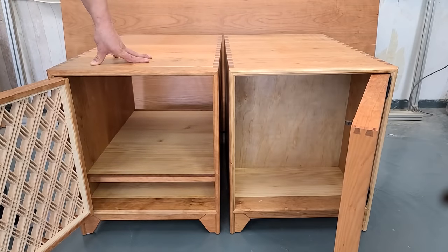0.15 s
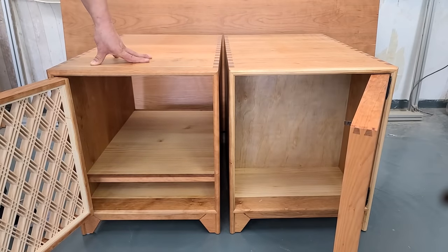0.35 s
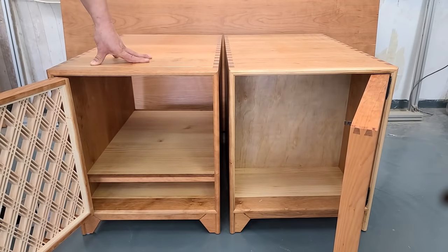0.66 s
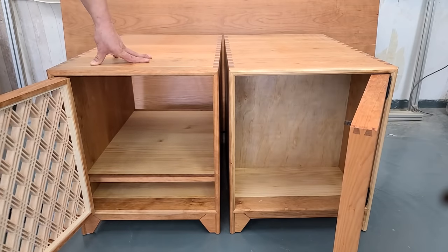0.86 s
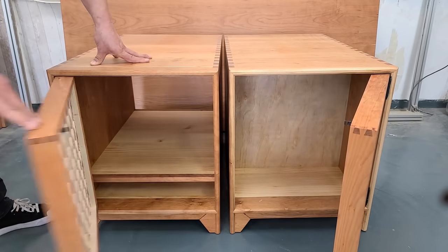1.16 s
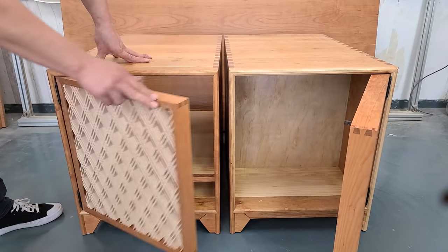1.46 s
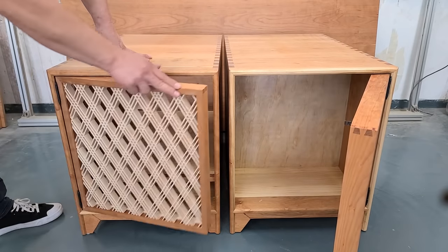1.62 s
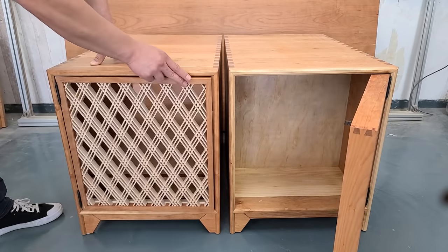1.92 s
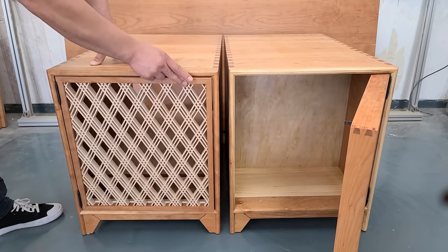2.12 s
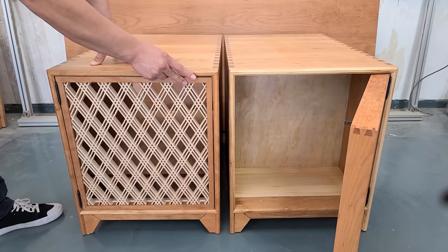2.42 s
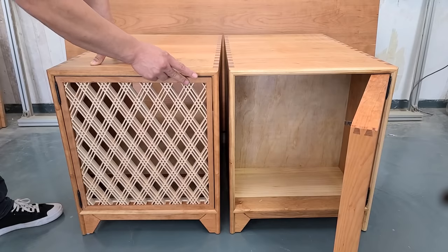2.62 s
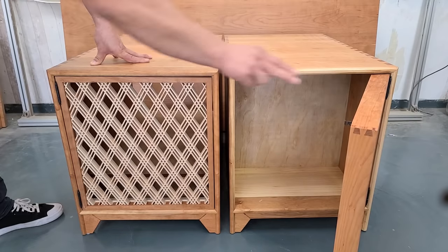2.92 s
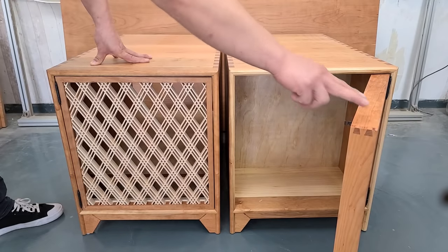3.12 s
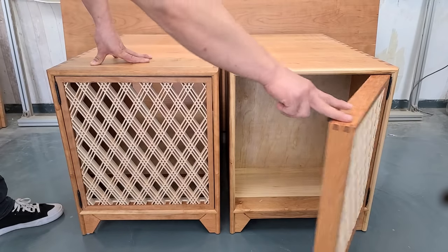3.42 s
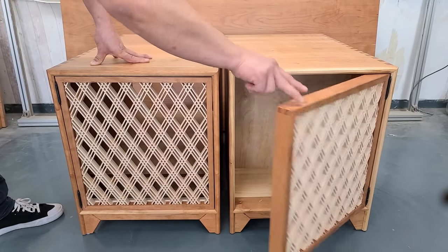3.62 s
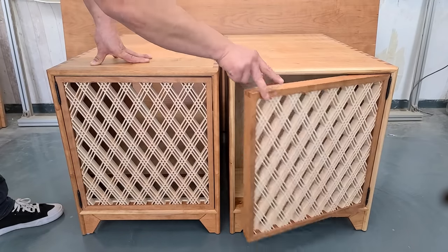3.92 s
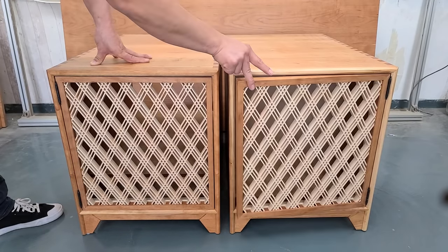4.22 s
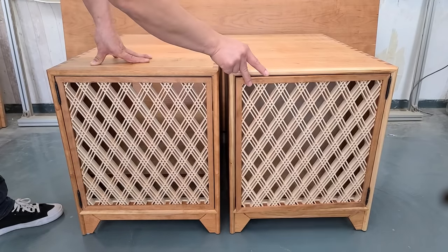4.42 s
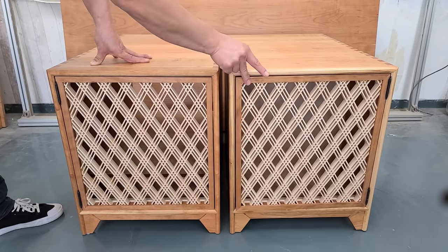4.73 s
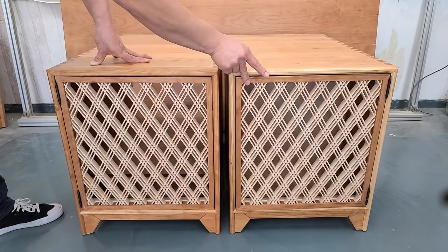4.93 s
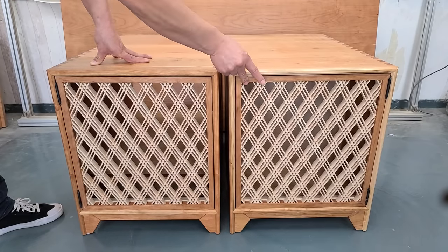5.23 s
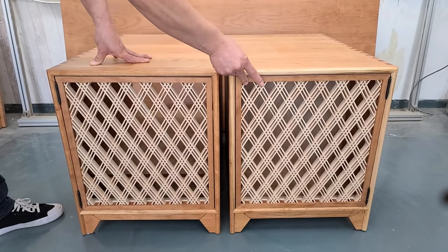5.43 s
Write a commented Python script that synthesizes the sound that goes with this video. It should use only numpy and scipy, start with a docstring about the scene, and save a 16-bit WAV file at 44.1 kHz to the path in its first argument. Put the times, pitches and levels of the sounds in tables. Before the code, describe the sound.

In a slightly echoing workshop with a low ventilation rumble and faint hum, a hinge squeaks briefly and a wooden cabinet door taps its frame, then shuts with one sharp, hollow clap. A barely audible rubbing follows. A second door gives a light wooden knock, a couple of tiny clicks and a last soft knock as it closes. The microphone is about a metre away.

```python
"""Cabinet doors in a workshop

Two wooden doors are swung shut by hand, a metre from a phone in a hard-floored workshop. The hinges
squeak by stick-slip, one door taps its frame and claps into its catch, and after a faint rub the
second knocks and settles. Each blow rings the panels and the air inside. The hall rings on for about
half a second, over a low ventilation rumble with a faint hum."""
import sys
import numpy as np
from scipy import signal
from scipy.fft import rfft, irfft, next_fast_len
from scipy.io import wavfile
from scipy.ndimage import uniform_filter1d

SR = 44100
rng = np.random.default_rng(int(sys.argv[2]) if len(sys.argv) > 2 else 0)


def unload_audio(sound):
    """Save the sound as a 16-bit wav file, at the path given as the first command line argument."""
    columns = np.transpose(np.atleast_2d(sound))
    # keep every value between -1 and 1, then stretch to whole-number steps
    steps = np.round(np.clip(columns, -1, 1) * 32767)
    wavfile.write(sys.argv[1], SR, steps.astype(np.int16))


N = 245372
TIME = np.arange(N) / SR
PAD = next_fast_len(N + SR)
FREQ = np.maximum(np.arange(PAD // 2 + 1) * SR / PAD, 1)

# Ventilation spectrum. Each row: frequency in Hz, relative density in dB.
VENT_SPECTRUM = [(11, -37), (18, -5.5), (72, -1.5), (93, -4), (110, -18), (183, -17), (210, -20.5),
                 (229, -22), (321, -21.5), (438, -24.5), (477, -23.5), (534, -31), (749, -28.5),
                 (2530, -46.5), (15400, -68.5)]
# Its stereo width. Each row: frequency in Hz, side minus mid in dB.
VENT_WIDTH = [(60, -18.5), (110, -17), (200, -10.5), (380, -6.5), (700, -3), (1290, 2), (2380, 0.5),
              (4400, 0.5), (8120, -4.5), (15000, 5)]
# Faint treble in the room tone. Each row: centre in Hz, width in Hz, level in dB.
HISS_BANDS = [(8350, 1100, -85.5), (13300, 600, -96), (12530, 4000, -88.5)]
# Hum lines. Each row: frequency in Hz, level in dB.
HUM_LINES = [(54, -55), (242, -73), (350, -75), (479.5, -67.5), (13060, -101), (13566, -101)]
# Swells of a low drone. Each row: start in seconds, length in seconds, level in dB.
DRONE_SWELLS = [(1.7, .36, -53.5), (2.13, 0.26, -41), (2.656, 0.596, -48)]
# Decay of the hall. Each row: frequency in Hz, t60 in seconds.
HALL_DECAY = [(60, 0.91), (250, 0.66), (1000, 0.64), (3000, 0.58), (6000, 0.42), (10000, 0.51),
              (16000, 0.19)]
# Stereo width of the echo. Each row: frequency in Hz, side minus mid in dB.
HALL_WIDTH = [(60, -21), (110, -11.5), (200, -15.5), (380, -7), (700, -1.5), (1290, 0.5), (2380, -0.5),
              (4400, 0), (8120, 0.5), (15000, 0.5)]
# Colour of the rubbing. Each row: centre in Hz, width in Hz, relative level in dB.
RUB_COLOUR = [(1206, 1000, 11), (2990, 1800, 4), (4770, 1800, 1), (10580, 300, -1.2), (9200, 7500, 1)]
# How the door colours a squeak. Each row: frequency in Hz, gain in dB.
DOOR_RESPONSE = [(570, -8), (670, -28.5), (1100, -0.5), (1230, -9), (1400, -13), (1850, 0.5), (2050, -8),
                 (2400, -28), (2680, -7), (3050, -7), (3250, -19), (3380, -11), (3700, -38), (4050, -27.5),
                 (5000, -55), (6100, -33)]
# Stick-slip, one list per hinge. Each row: time in seconds, slip rate in Hz, gain in dB,
# tilt in dB per octave, extra gain of the 4th and of the 5th partial in dB.
HINGE_SLIPS = [
    [(1.38, 654, -65, 2, 3, -14), (1.45, 658.6, -57, 4, 5, -4.5), (1.5, 667, -55.5, 2, 4.5, 1),
     (1.58, 672, -52, 2, -9, 3.5), (1.67, 666, -61.5, 5, -6, 2), (1.74, 665, -78, 0, -6, 0)],
    [(1.54, 645, -64, 4, -6, 0), (1.62, 630.7, -56, 3, -6, 2), (1.72, 609.2, -60.5, -1, -8, 2),
     (1.8, 590, -64.5, -4, -8, 0), (1.9, 552, -65.5, -10.5, -5, 0), (1.925, 533, -77, -6, -10, 0),
     (2.05, 508, -76.5, -6.5, -6, 0)],
]
# Modes of the cabinets' panels and air. Each row: frequency in Hz, gain in dB, t60 in seconds.
CABINET_MODES = [(55.2, -1, 0.11), (74, 4.5, 0.47), (89.7, -4, 0.18), (113, 0.5, 0.2), (132.6, 4.5, 0.3),
                 (169, 0, 0.34), (197.6, -4, 0.37), (216.4, 1.5, 0.32), (241.2, -2, 0.15),
                 (279.2, -1.5, 0.29), (294, -2, .15), (324, -2.5, 0.16), (344.3, -2, .3), (364.5, 0, 0.37),
                 (416.2, 3, .2), (469.3, -8.5, 0.099), (549, 3, .22), (591.8, -4, 0.18), (643.6, 0, 0.16),
                 (723, 0, 0.42), (859, -4, 0.35), (923, -0.5, .25), (1030, -1, 0.092), (1079, -7, 0.37),
                 (1360, 7, 0.055), (1460, -7.5, .08), (1860, -3, 0.072)]
# Blows on the wood. Each row: start in seconds, gain in dB, centre in Hz, reach in octaves,
# share of the modes' t60 that rings.
DOOR_BLOWS = [(2.056, -40.5, 199, 0.24, 1), (2.062, -46, 403, 0.19, 1), (2.084, -39, 132, 0.18, 1),
              (2.131, -40.5, 131.4, 0.26, .8), (2.162, -45, 120, 0.72, 0.96), (2.49, -23, 252.2, .61, 0.92),
              (2.496, -30, 113, 0.35, 0.71), (2.506, -20, 420, 0.77, 0.74), (2.508, -21.5, 960, 0.63, 0.74),
              (2.527, -17.5, 322, .45, .8), (2.543, -17.5, 348, 0.19, 0.87), (2.565, -37.5, 95.2, .6, 1),
              (2.599, -38.5, 99, 0.86, .9), (3.725, -31, 200, 0.55, 0.55), (3.727, -34, 66, 0.57, 1),
              (3.73, -44.5, 454, 0.42, 0.82), (3.947, -39, 84.4, 0.65, .7), (4.054, -50.5, 59.9, 0.7, 0.65),
              (4.61, -48.5, 172.3, 0.88, 0.58), (4.667, -49, 189, 0.71, 0.64),
              (5.094, -30.5, 166, 0.22, 0.49), (5.105, -47, 379, 0.36, 0.62),
              (5.093, -25.5, 219.2, 0.063, 0.73)]
# Modes of the catch's small hard parts. Each row: frequency in Hz, gain in dB, t60 in seconds.
CATCH_MODES = [(2980, 0, 0.035), (3340, -2, 0.029), (3680, -3, .02), (4033, -0.5, 0.014),
               (4500, -2.5, 0.014), (4850, -4.5, .016), (5243, -3.5, 0.016), (6650, -7.5, 0.016),
               (8770, -4, 0.0282)]
# Light contacts, each a tick, a snap of the frame and a treble fizz. Each row: start in seconds,
# tick gain in dB, centre in Hz and reach in octaves, the same three for the snap, fizz gain in dB,
# left minus right in dB, extra hall send in dB.
LIGHT_CONTACTS = [(2.047, -40, 4050, .17, -46, 1720, 0.36, -56.5, 2, 0.5),
                  (2.056, -47, 6000, .3, -46, 910, 0.57, -61, 4, 3.5),
                  (2.108, -43.5, 4050, 0.17, -50.5, 3000, 0.43, -55.5, 1, -2.5),
                  (2.396, -53.5, 3430, .19, -54, 1550, .44, -74, 2.5, 6),
                  (3.7232, -46.5, 5000, .6, -30.5, 847, 1.0, -65.5, 3.5, -5),
                  (4.608, -52.5, 3910, 0.42, -51, 1100, 0.86, -79, 2.5, -1),
                  (4.665, -53.5, 4100, 0.24, -51.5, 1190, 0.76, -77, 2.5, -2),
                  (5.055, -68, 3000, .4, -65.5, 2800, 0.79, -69, 1.5, -0.5),
                  (5.086, -54.5, 4200, .9, -54, 1490, 0.7, -58.5, -2, -.5),
                  (5.108, -61.5, 3700, 0.31, -57.5, 1600, .88, -65, -2, -9)]
# The clap, edge meeting frame from first bright touch to full face. Each row: start in seconds,
# gain in dB, centre in Hz, reach in octaves, left minus right in dB, hall send in dB.
CLAP_STAGES = [(2.492, -18.5, 7480, 1, 5.5, -7), (2.497, -17.5, 2700, 0.9, 1.5, 1.2),
               (2.502, -14.5, 2600, .8, 4.5, -1.5), (2.507, -9, 1050, 0.92, 2.5, -0.9)]


def undb(db):
    """Decibels to gain."""
    return 10 ** (np.asarray(db) / 20)


def unit(x):
    """Scale to rms 1."""
    return x / np.sqrt(np.mean(x ** 2))


def on_log(table, hz):
    """Read (Hz, value) rows on a log-frequency axis."""
    freqs, values = np.transpose(table)
    return np.interp(np.log(hz), np.log(freqs), values)


def shape(x, gain):
    """Filter by a gain for each FREQ."""
    return irfft(rfft(x, PAD) * gain, PAD)[..., :N]


def bell(hz, centre_hz, octaves):
    """Bell-shaped weight on a log-frequency axis."""
    return np.exp(-.5 * (np.log2(hz / centre_hz) / octaves) ** 2)


def band(hz, width_hz):
    """Noise in one resonance, unrelated left and right, rms 1."""
    phases = np.exp(2j * np.pi * rng.random((2, len(FREQ))))
    return unit(irfft(phases / (1 + (2 * (FREQ - hz) / width_hz) ** 2), PAD)[:, :N])


def walk(rate_hz):
    """Random steps, smoothed twice, rms 1."""
    hold = int(SR / rate_hz)
    steps = np.repeat(rng.standard_normal(N // hold + 1), hold)
    return unit(uniform_filter1d(uniform_filter1d(steps, hold), hold)[:N])


def spread(width_table, length):
    """Spectra of a left and a right noise that share the mid and differ by the side."""
    mid, side = rfft(rng.standard_normal((2, length)), PAD)
    return mid + np.array([[1], [-1]]) * side * undb(on_log(width_table, FREQ))


def swell(start_s, length_s, db, attack_s=.1, release_s=.1):
    """Attack, hold and release as a smooth gain."""
    ramp = np.minimum((TIME - start_s) / attack_s, (start_s + length_s - TIME) / release_s)
    return undb(db) * np.sin(np.clip(ramp, 0, 1) * np.pi / 2) ** 2


def ventilation(level_db=-50, crossover_hz=110):
    """Moving air; the rumble and the rush above it each wander by about a decibel."""
    noise = spread(VENT_WIDTH, N) * undb(on_log(VENT_SPECTRUM, FREQ))
    bass = 1 / (1 + (FREQ / crossover_hz) ** 4)
    rumble = irfft(noise * bass, PAD)[:, :N] * undb(walk(8.3))
    rush = irfft(noise * (1 - bass), PAD)[:, :N] * undb(.98 * walk(7.1))
    return unit(rumble + rush) * undb(level_db)


def room_tone(drone_hz=91.8):
    """The workshop all round the microphone: ventilation, faint hiss, hum and a swelling drone."""
    air = ventilation()
    hiss = sum(undb(db) * band(hz, width) for hz, width, db in HISS_BANDS)
    hum = sum(undb(db + .9 * walk(4.7)) * np.sin(2 * np.pi * hz * TIME) for hz, db in HUM_LINES)
    drone = sum(swell(*row) for row in DRONE_SWELLS) * np.sin(2 * np.pi * drone_hz * TIME)
    return air + hiss + np.sqrt(2) * (hum + drone)


def hall(send, rise_s=.002):
    """Dense echoes off the far walls: each half-octave dies at its own rate."""
    noise, t, tail = spread(HALL_WIDTH, SR), np.arange(SR) / SR, 0
    for hz in 45 * 2 ** np.arange(0, 9, .5):
        part = irfft(noise * bell(FREQ, hz, octaves=.25), PAD)[:, :SR]
        tail = tail + part * undb(-60 * t / on_log(HALL_DECAY, hz))
    tail *= 1 - np.exp(-t / rise_s)
    tail /= np.sqrt(np.sum(tail ** 2) / 2)
    return shape(send, rfft(tail, PAD))


def hand_rub():
    """A thin rubbing hiss while the hand moves."""
    hiss = sum(undb(db) * band(hz, width) for hz, width, db in RUB_COLOUR)
    return hiss * swell(start_s=2.95, length_s=.78, db=-80, attack_s=.15, release_s=.04)


def hinge(slips, wobble=.013, flutter_db=4.5):
    """Nearly regular slips: a harmonic stack that wobbles and flutters, coloured by the door."""
    times, hz, db, tilts, *extra_db = np.transpose(slips)
    span = slice(int(times[0] * SR), int(times[-1] * SR))
    t, out = TIME[span], np.zeros(N)
    slip_hz = np.interp(t, times, hz) * (1 + wobble * walk(220)[span])
    phase = 2 * np.pi * np.cumsum(slip_hz) / SR
    tilt = np.interp(t, times, tilts)
    for k in range(1, 10):
        colour_db = on_log(DOOR_RESPONSE, k * slip_hz) + tilt * np.log2(k / 3)
        if k in (4, 5):
            colour_db += np.interp(t, times, extra_db[k - 4])
        out[span] += undb(colour_db + flutter_db * walk(110)[span]) * np.sin(k * phase)
    out[span] *= signal.windows.tukey(len(t), .15)
    return out * undb(np.interp(TIME, times, db, left=-140, right=-140))


def catch(rise_s=.00051, lag_s_per_db=2e-5, send_db=-.5):
    """Each tick rings the modes of the catch nearest its centre. Returns left, right, hall send."""
    out, t = np.zeros((3, N + SR)), np.arange(SR // 10) / SR
    hz, db, t60 = np.transpose(CATCH_MODES)[:, :, None]
    for start, tick_db, centre_hz, reach, *_, pan_db, extra_db in LIGHT_CONTACTS:
        offset = rng.random(hz.shape)
        fade = bell(hz, centre_hz, reach) * undb(tick_db + db - 60 * t / t60)
        fade *= 1 - np.exp(-t / rise_s)
        i = int(start * SR)
        for channel, side_db in enumerate((pan_db / 2, -pan_db / 2, 0)):
            phase = 2 * np.pi * (hz * (t + side_db * lag_s_per_db) + offset)
            gain = undb(side_db if channel < 2 else send_db + extra_db)
            out[channel, i:i + len(t)] += gain * np.sum(fade * np.sin(phase), axis=0)
    return out[:, :N]


def cabinet(scatter_db=2, detune=.013, skew_rad=.68, skew_hz=800):
    """Blows ring the panels and the air inside; where each lands picks the modes."""
    out, t = np.zeros((2, N + SR)), np.arange(SR // 2) / SR
    hz, db, t60 = np.transpose(CABINET_MODES)[:, :, None]
    sign = (-1.) ** np.arange(len(hz))[:, None]  # neighbouring modes start in opposite directions
    for start, blow_db, centre_hz, reach, share in DOOR_BLOWS:
        level_draw, pitch_draw, skew_draw = rng.standard_normal((3, len(hz), 1))
        push_s = .0021 * undb(.35 * (-30.5 - blow_db))  # a lighter blow pushes for longer
        mode_db = db + scatter_db * level_draw - 60 * t / (share * t60)
        fade = bell(hz, centre_hz, reach) * sign * undb(mode_db)
        phase = 2 * np.pi * hz * (1 + detune * pitch_draw) * t
        # Modes reach the two microphone ports out of step, more so the higher they are.
        skew = skew_rad * skew_draw * hz / (hz + skew_hz)
        ring = np.array([np.sum(fade * np.sin(phase + side * skew), axis=0) for side in (1, -1)])
        i = int(start * SR)
        out[:, i:i + len(t)] += undb(blow_db) * ring * (1 - np.exp(-t / push_s))
    return out[:, :N]


def crack(start, db, centre_hz, reach, pan_db, send_db, rise_s, t60, lag_s_per_db=6e-5):
    """Hard edges meet in a short, broad burst of noise. Returns left, right, hall send."""
    length, lead = 8192, 256  # samples
    t = np.maximum(np.arange(length) - lead, 0) / SR
    hz = np.maximum(np.arange(length // 2 + 1) * SR / length, 1)
    fade = undb(-60 * t / t60) * (1 - np.exp(-t / rise_s))
    grains = rfft(rng.standard_normal(length) * fade)
    # Many small contacts together fill the band evenly.
    even = grains / np.sqrt(uniform_filter1d(np.abs(grains) ** 2, size=48))
    # The louder side arrives slightly first; the lag fades above 5 kHz, keeping the treble fizz clear.
    side_db = np.array([[pan_db / 2], [-pan_db / 2], [0]])
    early_s = side_db * lag_s_per_db / (1 + (hz / 5000) ** 4)
    burst = irfft(even * bell(hz, centre_hz, reach) * np.exp(2j * np.pi * hz * early_s))
    burst *= np.sqrt(np.sum(fade ** 2) / np.sum(burst[2] ** 2))
    out, i = np.zeros((3, N + length)), int(start * SR) - lead
    out[:, i:i + length] = burst * undb(db + side_db + [[0], [0], [send_db]])
    return out[:, :N]


def frame_taps(delay_s=.001):
    """Just after each tick of the catch, the frame snaps with a fizz of treble."""
    out = np.zeros((3, N))
    for start, _, _, _, snap_db, snap_hz, snap_reach, fizz_db, pan_db, extra_db in LIGHT_CONTACTS:
        out += crack(start + delay_s, snap_db, snap_hz, snap_reach, pan_db,
                     send_db=extra_db - 4.5, rise_s=.002, t60=.13)
        out += crack(start + delay_s, fizz_db, centre_hz=8500, reach=.6, pan_db=pan_db,
                     send_db=extra_db - 4, rise_s=.0025, t60=.055)
    return out


def clap(ring_cycles=26.5):
    """The door's edge meets the frame in a quick run of cracks; the lower ones last longer."""
    return sum(crack(start, db, hz, reach, pan_db, send_db, rise_s=.0016, t60=.022 + ring_cycles / hz)
               for start, db, hz, reach, pan_db, send_db in CLAP_STAGES)


def scene(squeak_send_db=-3.5, wood_send_db=-2.5, bass_cut_hz=222):
    """The doors a metre from the microphone, with the hall's echo and the room tone behind."""
    squeak = sum(hinge(slips) for slips in HINGE_SLIPS)
    wood = cabinet()
    edges = clap() + frame_taps() + catch()
    # Small panels send little bass to the far walls.
    far_wood = shape(wood.mean(axis=0), 1 / (1 + bass_cut_hz / (1j * FREQ)) ** 2)
    echo = hall(undb(squeak_send_db) * squeak + undb(wood_send_db) * far_wood + edges[2])
    return squeak + wood + edges[:2] + echo + hand_rub() + room_tone()


def record(dry):
    """The phone cuts the top steeply."""
    top_hz = 15550
    return signal.sosfilt(signal.ellip(10, .2, 70, top_hz, fs=SR, output="sos"), dry)


dry = scene()
out = record(dry)
unload_audio(out)
```